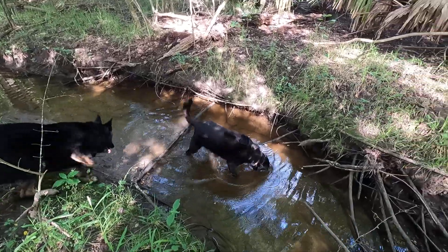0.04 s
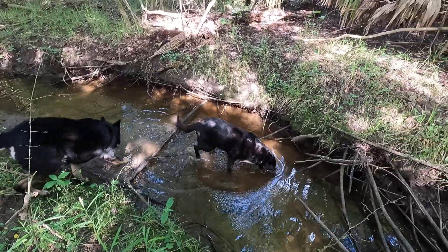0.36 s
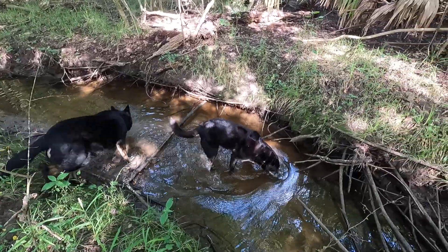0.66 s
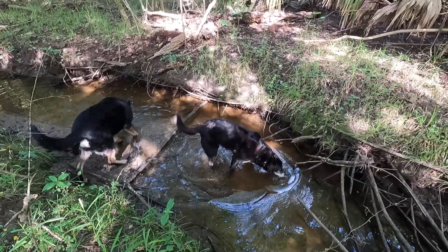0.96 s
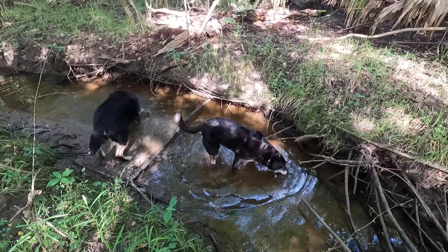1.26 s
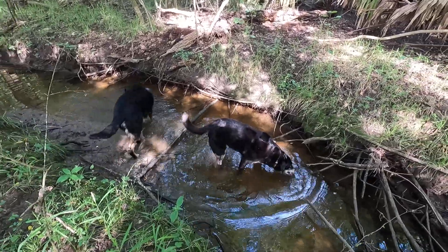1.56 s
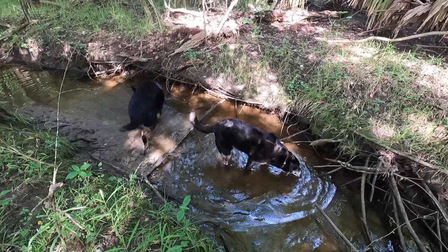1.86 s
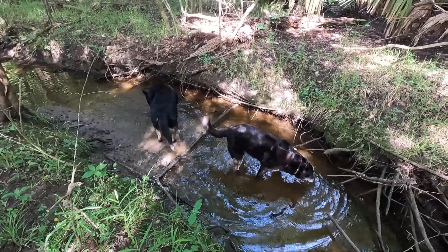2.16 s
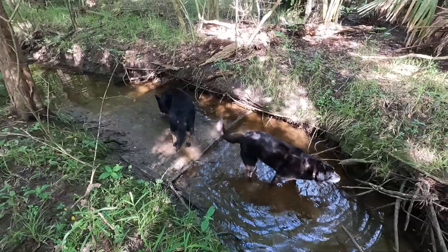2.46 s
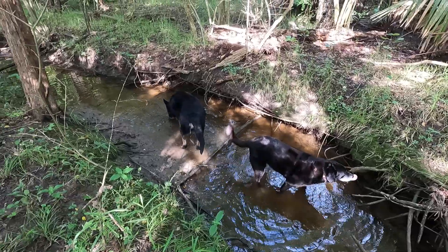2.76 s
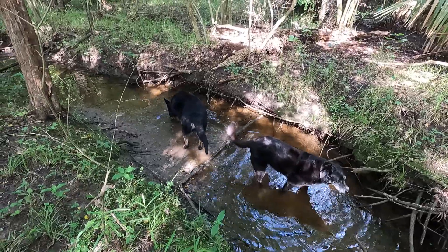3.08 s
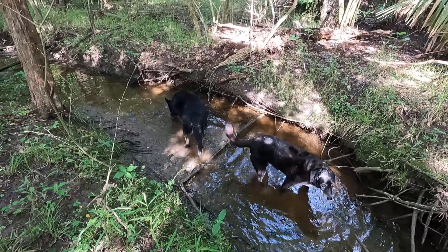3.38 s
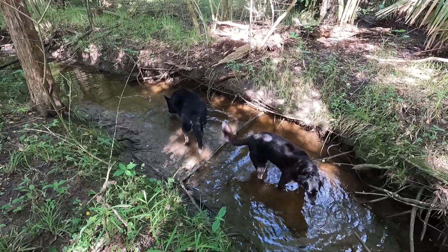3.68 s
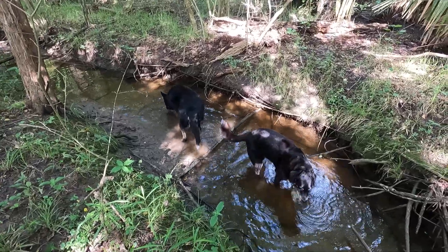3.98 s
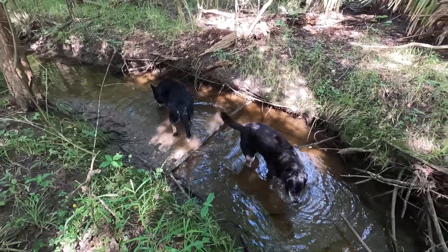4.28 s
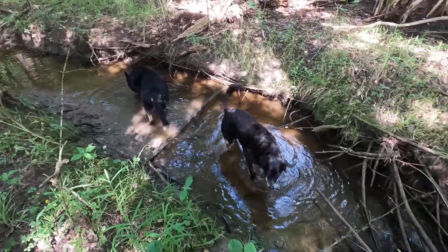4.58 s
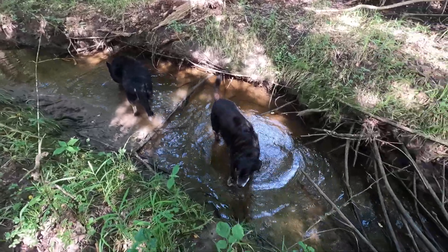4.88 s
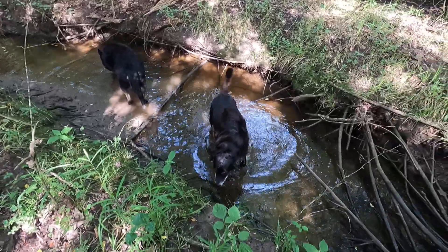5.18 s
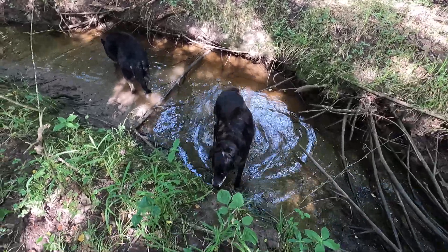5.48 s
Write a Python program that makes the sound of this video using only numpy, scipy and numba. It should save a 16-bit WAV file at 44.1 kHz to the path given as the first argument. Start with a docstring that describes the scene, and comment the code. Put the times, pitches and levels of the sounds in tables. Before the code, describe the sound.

Dogs wade through a shallow creek, sloshing, splashing and plopping irregularly, with one short snort over a faint trickle and distant traffic.

```python
"""A shallow woodland creek, with two dogs wading a few metres below a stereo microphone.
From the start their legs churn up swarms of small bubbles, paws and falling drops slap the surface,
and larger air pockets plop, most with a rising pitch. Past halfway the wading eases, and near 3.8 s
one dog snorts at the water; then the splashing picks up again. Behind it all, throughout,
lie a faint trickle, insects, and the rumble and hum of far traffic."""
import sys
import numpy as np
from scipy import signal
from scipy.fft import rfft, irfft, next_fast_len
from scipy.io import wavfile
from scipy.ndimage import uniform_filter1d
from numba import njit

SR = 44100
rng = np.random.default_rng(int(sys.argv[2]) if len(sys.argv) > 2 else 0)


def bounce(signal):
    """Save signal as a 16-bit WAV file at the path given by the first command-line argument."""
    frames = np.transpose(np.atleast_2d(signal))
    limited = np.clip(frames, -1, 1)
    pcm = np.round(limited * 32767).astype(np.int16)
    wavfile.write(sys.argv[1], SR, pcm)


N = 253134

# Legs sweeping through the shallows. Each row: start and length in seconds, then the levels in dB
# of deep slosh, gurgle and spray.
LEG_SWEEPS = [(0.0, 0.018, -66, -55, -57), (0.05, .01, -60, -56, -53), (0.127, 0.048, -52, -49, -52),
              (0.218, 0.085, -46, -49, -48.5), (0.337, 0.03, -39, -43.5, -46.5),
              (0.447, 0.13, -71, -50, -51.5), (0.59, .04, -44.5, -48.5, -48.5), (0.674, .01, -60, -54, -47),
              (0.736, 0.034, -57, -43, -42), (0.844, 0.053, -55.5, -68, -53.5),
              (0.963, 0.037, -70, -43.5, -47.5), (1.015, .03, -48, -48.5, -47),
              (1.083, 0.057, -52.5, -62, -48.5), (1.265, 0.052, -57, -48, -45.5),
              (1.35, 0.05, -49, -59, -56), (1.462, 0.077, -39, -49, -46), (1.642, 0.048, -46, -43.5, -50),
              (1.735, 0.17, -53.5, -48.5, -54.5), (1.94, 0.056, -55, -47.5, -61),
              (2.055, 0.023, -60, -42, -47.5), (2.117, 0.07, -56, -45.5, -54.5),
              (2.185, 0.089, -49, -52.5, -47), (2.467, 0.0091, -50, -58, -57),
              (2.574, 0.11, -51.5, -51, -52), (2.988, .05, -57, -51, -53), (3.276, .03, -45.5, -54, -55.5),
              (3.384, 0.024, -46.5, -52, -60), (3.592, 0.024, -52, -60, -69),
              (4.058, 0.044, -48.5, -49.5, -51), (4.157, .005, -45, -53, -55),
              (4.179, .03, -44.5, -47.5, -49), (4.25, 0.03, -66, -48, -53.5), (4.6, 0.062, -52, -49.5, -55),
              (4.7, 0.12, -65, -58, -52.5), (4.84, .02, -55, -46.5, -52), (4.96, 0.015, -47, -49, -52),
              (5.066, 0.16, -47, -49.5, -53), (5.286, 0.086, -41, -44.5, -49),
              (5.403, 0.14, -45.5, -49, -47), (5.58, 0.26, -50, -48, -49.5)]
# How fast the water calms after a stride: slosh, gurgle and spray in dB per second.
CALMING_DB_PER_S = [162, 181, 156]
# The stirring left between strides: slosh, gurgle and spray in dB.
RIPPLE_FLOOR_DB = [-55.5, -61.5, -62.5]
def strides(s, attack_s=0.013):
    """Slosh, gurgle and spray in dB at times s: water piles up ahead of a leg, holds, then settles."""
    power = from_db(RIPPLE_FLOOR_DB)[:, None] ** 2
    for start, length, *db in LEG_SWEEPS:
        swell = np.exp(-(np.minimum(s - start, 0) / attack_s) ** 2)
        settled_db = np.outer(CALMING_DB_PER_S, np.maximum(s - start - length, 0))
        power = power + (swell * from_db(np.array(db)[:, None] - settled_db)) ** 2
    return 10 * np.log10(power)


# The tone of the churned water. Each row: frequency in Hz, level in dB.
CHURN_SPECTRUM = [(200, 8), (420, -9), (700, 2), (1050, 6.5), (1500, 5.5), (2200, 2.5), (3500, -2),
                  (5500, -4.5), (7300, -9.5), (8800, -15), (12000, -22), (13500, -23), (15500, -38)]
def churn(low_hz, high_hz, spread_db, cycles, rise, slosh_db, gurgle_db, spray_db, count):
    """The legs stir up a swarm of bubbles; small ones are more numerous and ring for more cycles."""
    s = (np.arange(count) + rng.random(count)) / count * N / SR
    hz = np.interp(rng.random(count), [0, 1], [np.cbrt(low_hz), np.cbrt(high_hz)]) ** 3
    ringing = cycles * np.cbrt(hz / 1000) * 2 ** rng.uniform(-1, 1, count)
    strengths = rms_one(from_db(spread_db * np.minimum(rng.exponential(1, count), np.pi)))
    tone = rms_one(from_db(at_hz(CHURN_SPECTRUM, hz)) * np.cbrt(hz))
    # big bubbles follow the deep slosh, middling ones the gurgle, the smallest the spray
    levels_db = strides(s) + [[slosh_db], [gurgle_db], [spray_db]]
    blend = np.array([np.interp(np.log(hz), np.log([650, 1700, 4500]), row) for row in np.eye(3)])
    stirring = np.sum(blend * from_db(levels_db), axis=0)
    # keeps the swarm's power the same however many bubbles ring, and for however long
    density_gain = np.sqrt(4 * np.log(1000) * hz / ringing * N / SR / count)
    heights = stirring * strengths * tone * density_gain
    return bubble_rings(np.c_[s, heights, hz, ringing, rise * rng.random(count)], BUBBLE_SWELL, N)


BUBBLE_SWELL = 3.55   # how quickly a small bubble reaches its full swing, per cycle
@njit
def bubble_rings(rows, swell, size):
    """A bubble rings as it pinches off; a positive rise lifts its pitch as it nears the surface."""
    out = np.zeros(size)
    for k in range(len(rows)):
        s, height, hz, cycles, rise = rows[k]
        start, life, phase = int(s * SR), cycles * SR / hz, 0.
        for i in range(max(0, -start), min(int(life), size - start)):
            phase += 2 * np.pi * hz / SR * (1 + rise * (1 - np.exp(-i / life)))
            envelope = 1000. ** (-i / life) * (1 - np.exp(-swell * hz * i / SR))
            out[start + i] += height * envelope * np.sin(phase)
    return out


# Single air pockets. Each row: start in seconds, level in dB, starting pitch in Hz, cycles until
# silent, glide as a share of the pitch (negative falls).
AIR_POCKETS = [(0.1327, -29, 900, 26, -.2), (0.209, -28.5, 1273, 49, 0.28), (0.229, -28.5, 1280, 33, 0.81),
               (0.2514, -30.5, 734, 54, 0.82), (0.2588, -24, 1280, 17, 0.12), (0.3192, -22, 647, 25, -0.16),
               (0.326, -20, 770, 12, -0.023), (0.3303, -32.5, 5570, 130, -0.17),
               (0.3516, -26, 680, 26, 0.17), (0.4746, -35, 2900, 69, 0.4), (0.5042, -34, 964, 166, 0.76),
               (0.5598, -35.5, 704, 66, 0.97), (0.6017, -28, 2640, 24, .2), (0.6257, -27.5, 1030, 51, 1),
               (0.7214, -31.5, 673, 13, 0.78), (0.7309, -32, 6840, 30, .15),
               (0.7328, -29.5, 2600, 79, 0.56), (0.869, -35.5, 256, 11, 0.31), (0.9612, -31, 1190, 49, .05),
               (1.0114, -22.5, 2400, 31, 0.5), (1.014, -33, 1290, 45, 0.77), (1.0178, -22, 3530, 10, .65),
               (1.256, -31.5, 7140, 31, .45), (1.275, -17, 1548, 7, .15), (1.2798, -26.5, 1850, 26, 0),
               (1.3895, -21.5, 2699, 6.3, -.2), (1.4532, -28, 1270, 20, 0.29), (1.4657, -27, 487, 9.5, 0),
               (1.5063, -29, 570, 14, .6), (1.5207, -27, 1920, 19, -0.037), (1.54, -26, 319, 16.6, 0.44),
               (1.6553, -29, 4484, 11, 0.45), (1.6682, -18.5, 1310, 9.3, 0.48),
               (1.676, -23.5, 1554, 61, .3), (1.8363, -33, 1580, 65, 1), (1.9189, -26.5, 552, 5, -.1),
               (1.973, -33, 1380, 55, 0.99), (2.0551, -23, 1030, 35, 0.0064), (2.0551, -23, 5000, 9.3, -.3),
               (2.0628, -32.5, 6096, 36, 0), (2.0778, -22, 950, 35, 0.12), (2.0812, -27, 1120, 41, 0.32),
               (2.1018, -25, 1550, 27, .7), (2.1253, -36.5, 685, 54, -0.18), (2.1556, -29.5, 5259, 16, .65),
               (2.2051, -31.6, 2309, 66, .1), (2.2262, -32, 663, 28, 0.6), (2.229, -25.5, 1920, 19, 0),
               (2.266, -33, 7127, 53, .2), (2.2858, -25, 2230, 22, 0.11), (2.2863, -25, 3330, 25, 0),
               (2.288, -33, 6500, 45, -.15), (2.3828, -32, 5840, 27, .7), (2.4, -35, 1950, 41, -0.19),
               (2.7252, -30.5, 1415, 35, -0.043), (2.747, -38.5, 4200, 37, 0),
               (2.7952, -33.5, 1740, 16, 0.36), (2.9298, -32.5, 715, 13, 0.53), (3.0208, -28, 1704, 13, .6),
               (3.0495, -40, 578, 30, 0.092), (3.3543, -32, 626, 37, -.2), (3.4059, -37, 2610, 110, 0.0038),
               (3.4074, -31.5, 2930, 27, 0.69), (3.4105, -31, 1870, 34, 0.49), (4.006, -40.5, 4670, 39, .1),
               (4.022, -45, 6960, 35, -0.017), (4.0648, -32, 1604, 91, -0.22),
               (4.189, -26.5, 3360, 42, 0.64), (4.2218, -27.5, 960, 23, -0.062),
               (4.36, -22.5, 1710, 20, -0.4), (4.5607, -37, 780, 39, 0.36), (4.5945, -39.5, 564, 54, -0.22),
               (4.6101, -27, 4550, 29, .3), (4.766, -34, 2570, 65, 0.081), (4.9088, -34, 757, 42, -0.24),
               (4.909, -35, 4500, 66, .35), (4.911, -40, 3230, 60, .1), (4.9618, -34, 1710, 37, -0.28),
               (4.9655, -34.5, 2740, 41, 0.62), (4.9796, -21, 2258, 5.8, 0.82),
               (5.0524, -37.5, 938, 120, 0), (5.0715, -34.5, 1670, 53, 1), (5.0952, -36, 228, 45, 0.67),
               (5.2098, -34.5, 800, 32, -.2), (5.2553, -24, 506, 16.6, 1), (5.276, -40, 358, 39, .45),
               (5.2988, -27.5, 568, 28, 0.43), (5.3076, -19.5, 1160, 4.1, 0.35),
               (5.3995, -18, 1290, 26, 0.26), (5.3993, -18, 2600, 6.3, .65),
               (5.4046, -20.5, 1400, 24, 0.16), (5.4308, -20, 2750, 11, -.1),
               (5.478, -20, 3630, 13, -0.024), (5.4932, -33, 5200, 45, .8), (5.602, -31, 5100, 36, .15),
               (5.638, -33, 1420, 120, 0.33)]
def plops(level_db, swell):
    """Larger air pockets and drips ring out singly above the swarm."""
    s, db, hz, cycles, rise = np.transpose(AIR_POCKETS)
    return bubble_rings(np.c_[s, from_db(db + level_db), hz, cycles, rise], swell, N)


# Paws and drops hitting the surface. Each row: start in seconds, level in dB, then offsets in dB
# for the low body and the fine mist.
SURFACE_HITS = [(0.1331, -44.5, 15, -22), (0.2655, -36.5, 3, -21), (0.3282, -34, 3, -20),
                (0.4704, -37.5, -0.5, -35), (0.5034, -40, -1, -20), (0.5501, -37, 0, -23),
                (0.6071, -40, 14, -20), (0.7284, -30.5, -5, -26), (1.012, -47, -7, -6),
                (1.232, -44, -20, -14), (1.293, -39, -18, -31), (1.386, -36, -23, -31),
                (1.518, -31.5, -4, -31), (1.536, -30.5, -14, -21), (1.6557, -32, 6.5, -25),
                (1.8328, -43, -4, -17), (2.0191, -40, -11, -26), (2.155, -35, -7, -15),
                (2.266, -41, -5, -16), (2.2833, -33.5, -2, -23), (2.381, -40.5, -14, -23),
                (2.471, -33.5, -30, -33), (2.6247, -36.5, -21, -22), (2.713, -39.5, 11, -26),
                (2.9227, -37.5, 4, -25), (3.0153, -31.5, -5, -30), (3.0538, -37.5, 4.5, -28),
                (3.408, -43, -8, -20), (3.617, -43.5, -12, -42), (4.0424, -38.5, -7, -33),
                (4.188, -37, 7.5, -19), (4.2814, -36, -15, -21), (4.3584, -40, 0, -33),
                (4.42, -43.5, -19, -23), (4.6077, -40, -10, -24), (4.775, -36, -5, -22),
                (4.8483, -34.5, -10, -23), (4.9077, -33.5, -18, -23), (4.9604, -36.5, 8, -8),
                (4.9793, -45, -4, -9), (5.0514, -45, 16, -36), (5.3798, -33.5, -4, -25),
                (5.4283, -32, -2, -27), (5.478, -32, -28, -30), (5.49, -31.5, -28, -22),
                (5.6014, -43, -13, -15), (5.637, -36.5, -15, -24)]
def slaps(crack_db, body_db, mist_db, cycles, rise, fade_db, cloud_s, count):
    """A slap traps a cloud of bubbles within milliseconds, then fewer, weaker ones as drops fall back."""
    rows, pitches = [], np.geomspace(480, 13500, count)
    for s, db, body, mist in SURFACE_HITS:
        hz = pitches * 2 ** rng.normal(0, .05, count)
        delay = rng.gamma(1.5, .14, count)   # as a share of cloud_s
        spectrum = [(1520, body + body_db), (3000, crack_db), (7000, crack_db), (9300, mist + mist_db)]
        heights = from_db(db + at_hz(spectrum, hz) + fade_db * delay)
        ringing = cycles * np.cbrt(hz / 1000)
        rows.append(np.c_[s + delay * cloud_s, heights, hz, ringing, rise * rng.random(count)])
    return bubble_rings(np.vstack(rows), BUBBLE_SWELL, N)


# Hard drops landing around the dogs. Each row: start in seconds, level in dB.
HARD_DROPS = [(0.2142, -41), (0.701, -37), (1.4677, -42), (1.537, -37), (1.768, -46), (2.0044, -42.5),
              (2.382, -37), (4.9492, -37), (4.962, -43), (4.9873, -36.5), (5.4286, -42), (5.4804, -35),
              (5.4934, -35), (5.676, -36.5)]
def drop_ticks(level_db, t60_s):
    """A hard drop lands with a very short, bright crack."""
    out, t = np.zeros(N), np.arange(SR // 25) / SR
    for s, db in HARD_DROPS:
        crack = rms_one(band(rng.standard_normal(len(t)), 2300, 9200))
        tick = from_db(db + level_db) * crack * decay(t, t60_s)
        start = round(s * SR)
        out[start:start + len(t)] += tick[:N - start]
    return out


# One snort, down at the water. Each row: time in seconds, level in dB.
SNORT_LEVEL = [(3.76, -47), (3.798, -41), (3.84, -37.5), (3.93, -68)]
# The broad hiss of the breath. Each row: frequency in Hz, level in dB.
BREATH_SPECTRUM = [(210, -3), (400, -9.5), (750, -5), (1500, -4.5), (2100, -9), (4000, -13), (6000, -18.5),
                   (7600, -20), (8800, -24), (12000, -32), (14000, -32), (15500, -42)]
# Resonances of the nose. Each row: frequency in Hz, width in Hz, gain relative to the hiss.
NOSE_RESONANCES = [(1170, 29, 2.2), (2550, 150, 1), (3760, 400, 0.36), (5300, 220, 1.6), (6700, 300, 1.1),
                   (10400, 700, 0.76)]
def snort(flutter):
    """A short blast of air through the narrow passages of a wet nose."""
    level_db = in_time(SNORT_LEVEL)
    t = np.arange(N) / SR
    blowing = (t > SNORT_LEVEL[0][0]) & (t < SNORT_LEVEL[-1][0])
    soft_gate = uniform_filter1d(1. * blowing, SR // 50)
    spatter = np.exp(flutter * rms_one(band(rng.standard_normal(N), 40, 300)))
    air = spatter * colour(rng.standard_normal(N), BREATH_SPECTRUM)
    nose = sum(gain * signal.lfilter(*signal.iirpeak(hz, hz / width, fs=SR), air)
               for hz, width, gain in NOSE_RESONANCES)
    return from_db(level_db) * soft_gate * rms_one(air + nose)


# Sound scattered by banks and trees. Each row: frequency in Hz, level in dB against the direct sound.
BANK_SCATTER = [(300, -14), (1200, -11), (4000, -8), (8000, -7), (12000, -5)]
# Near reflections that differ left and right. Each row: frequency in Hz, level in dB, as above.
PLANT_REFLECTIONS = [(300, -19), (1200, -15), (4000, -14), (8000, -9), (12000, -3.5)]
# The left microphone against the right. Each row: frequency in Hz, phase in radians.
LEFT_PHASE = [(200, -.05), (800, -.35), (3200, -.65), (5000, -.45), (8000, -.35), (12000, 0)]
def creek_banks(direct, bank_t60_s, trees_db, trees_t60_s):
    """On the way up to the microphone, banks scatter the sound, trees add a tail and plants widen it."""
    t = np.arange(SR // 2) / SR
    near, far = rng.standard_normal((2, 2, len(t))) * (1 - np.exp(-(t / 0.0013) ** 2))
    banks = rms_one(near * decay(t, bank_t60_s))
    trees = from_db(trees_db) * rms_one(far * decay(t, trees_t60_s))
    echoes = (banks + trees) / np.sqrt(len(t))
    scattered = signal.fftconvolve(colour(direct, BANK_SCATTER)[None], echoes, axes=1)[:, :N]
    plants = rms_one(rng.standard_normal(len(t)) * t * np.exp(-t / .0015)) / np.sqrt(len(t))
    side = signal.fftconvolve(colour(direct, PLANT_REFLECTIONS), plants)[:N]
    phase = at_hz(LEFT_PHASE, np.arange(N // 2 + 1) * SR / N)
    left = irfft(rfft(direct) * np.exp(1j * phase), N)   # arrives slightly later
    return np.array([left, direct]) + scattered + side * [[1], [-1]]


# A far road, engine rumble and tyre noise. Each row: frequency in Hz, level in dB.
ROAD_SPECTRUM = [(20, 1), (45, 2), (65, 3.5), (100, -1), (140, -6.5), (220, -10), (330, -19.5),
                 (480, -29.5), (700, -26.5), (880, -11), (1050, -7), (1250, -17.5), (1600, -69),
                 (2600, -56)]
# The hum of its engines. Each row: pitch in Hz, width of its waver in Hz, level in dB.
ENGINE_TONES = [(63.6, 4, -45), (129.1, 8.4, -51), (190.4, 10, -68)]
# Their strength, of which only the swing about the mean counts. Each row: time in seconds, level in dB.
ENGINE_SWELL = [(0.0, -42.5), (0.85, -44.5), (1.7, -43), (2.45, -45), (2.75, -40), (3.1, -41), (3.6, -44),
                (4.25, -43), (4.8, -42.5), (5.4, -45.5), (5.74, -44.5)]
def traffic(road_db, hum_db):
    """Far engines hum and rumble, swelling and fading together under steady tyre noise."""
    t, hum = np.arange(N) / SR, 0
    for hz, width_hz, db in ENGINE_TONES:
        waver_hz = rms_one(band(rng.standard_normal(N), 0.88, 6.9)) * width_hz / 2
        hum = hum + from_db(db + hum_db) * np.sin(2 * np.pi * (hz * t + np.cumsum(waver_hz) / SR))
    road = from_db(road_db) * wide_noise(ROAD_SPECTRUM, side_db=-16.0)
    rumble = colour(road, [(110, 0), (200, -40)])
    tyres = road - rumble
    swell_db = in_time(ENGINE_SWELL)
    engines = (rumble + hum) * from_db(swell_db - swell_db.mean())
    return (tyres + engines) * from_db([[.4], [-.4]])   # a touch to the left


# The creek running behind the dogs. Each row: frequency in Hz, level in dB.
TRICKLE_SPECTRUM = [(300, -15), (600, 2.5), (1500, -1.5), (2400, -22), (3500, -11), (7000, -18),
                    (8700, -24), (10000, -34), (12500, -57), (15000, -44)]
def trickle(level_db):
    """Shallow running water makes a faint, wide, even wash."""
    return from_db(level_db) * wide_noise(TRICKLE_SPECTRUM, side_db=-3.0)


# Insects off in the trees. Each row: frequency in Hz, level in dB.
INSECT_SPECTRUM = [(8300, -40), (9400, -11), (9950, 0), (10200, -5), (10600, -40)]
def insects(level_db):
    """Insects blend into a thin, steady hiss near 10 kHz."""
    return from_db(level_db) * wide_noise(INSECT_SPECTRUM, side_db=-5.0)


def from_db(db):
    """Decibels to gain."""
    return 10 ** (np.asarray(db) / 20)


def rms_one(x):
    """Scale to unit power."""
    return x / np.sqrt(np.mean(x ** 2) + 1e-20)


def decay(t, t60_s):
    """An envelope that falls 60 dB in t60_s."""
    return np.exp(-np.log(1000) * t / t60_s)


def in_time(points):
    """Read a curve of (seconds, value) at every sample."""
    return np.interp(np.arange(N) / SR, *np.transpose(points))


def at_hz(points, hz):
    """Read a curve of (Hz, value) on a log-frequency axis."""
    points_hz, values = np.transpose(points)
    return np.interp(np.log(np.maximum(hz, 1)), np.log(points_hz), values)


def band(x, low_hz, high_hz):
    """Causal band-pass."""
    return signal.sosfilt(signal.butter(2, [low_hz, high_hz], "band", fs=SR, output="sos"), x)


def colour(x, spectrum):
    """Give a signal a smooth spectral shape."""
    size = next_fast_len(x.shape[-1])
    gains = from_db(at_hz(spectrum, np.arange(size // 2 + 1) * SR / size))
    return irfft(rfft(x, size) * gains, size)[..., :x.shape[-1]]


def wide_noise(spectrum, side_db):
    """Stereo noise of unit power; side_db sets how much left and right differ."""
    mid, side = colour(rng.standard_normal((2, N)), spectrum)
    return rms_one(mid + from_db(side_db) * side * [[1], [-1]])


def scene():
    """The dogs a few metres below the microphone, with the creek, the woods and the road behind."""
    foam = churn(198.4, 14500, spread_db=3.0, cycles=14.7, rise=0.078,
                 slosh_db=6.0, gurgle_db=0.5, spray_db=2.0, count=34000)
    gurgle = churn(350, 7500, spread_db=3.5, cycles=34, rise=.5,
                   slosh_db=0.0, gurgle_db=0.0, spray_db=-4.0, count=2200)
    splashes = slaps(crack_db=-6.0, body_db=-12.0, mist_db=7.0, cycles=19.8, rise=0.36,
                     fade_db=-32.5, cloud_s=.06, count=120)
    drops = drop_ticks(level_db=0.5, t60_s=0.0079)
    water = foam + gurgle + splashes + drops + plops(level_db=0.63, swell=2.17)
    dogs = creek_banks(water + snort(flutter=0.089), bank_t60_s=0.065, trees_db=-21.0, trees_t60_s=0.32)
    return dogs + trickle(level_db=-59.0) + insects(level_db=-79.5) + traffic(road_db=-43.5, hum_db=-1.0)


# The microphone's treble response. Each row: frequency in Hz, gain in dB.
MICROPHONE_RESPONSE = [(7300, 1), (8600, -1), (10500, -1), (11250, 1.5), (12200, 1), (12900, 0),
                       (13700, -9.5), (15000, -12), (16000, -22)]
CUTOFF_HZ = 15500
def record(dry):
    """The microphone blocks steady pressure and dulls the highest treble; the top is cut steeply."""
    heard = colour(band(dry, 8, 21000), MICROPHONE_RESPONSE)
    return signal.sosfilt(signal.ellip(10, .1, 90, CUTOFF_HZ, fs=SR, output="sos"), heard)


dry = scene()
out = record(dry)
bounce(out)
```